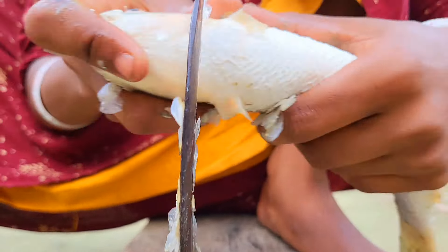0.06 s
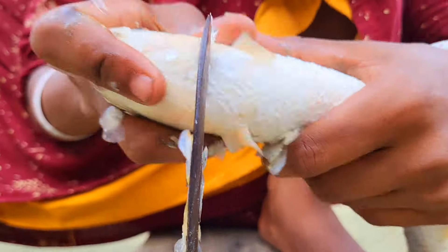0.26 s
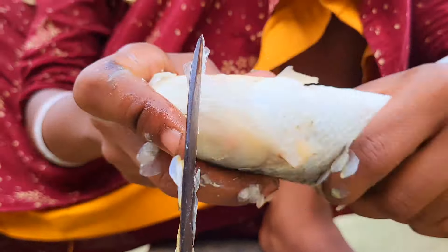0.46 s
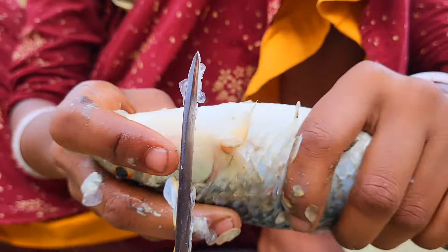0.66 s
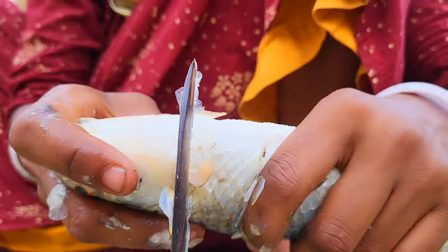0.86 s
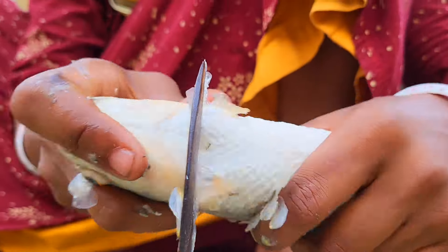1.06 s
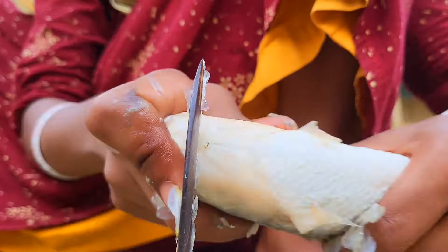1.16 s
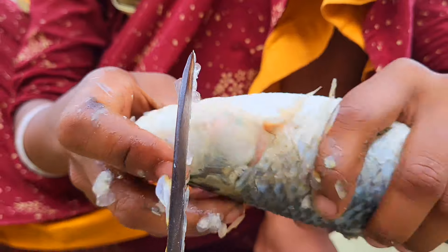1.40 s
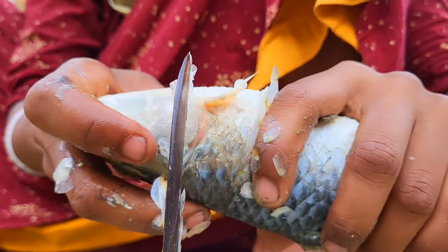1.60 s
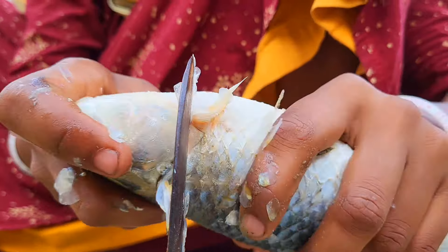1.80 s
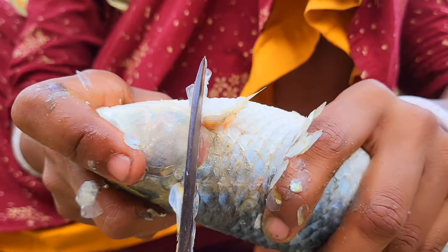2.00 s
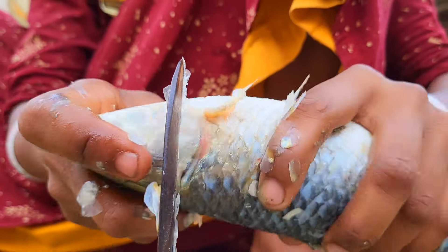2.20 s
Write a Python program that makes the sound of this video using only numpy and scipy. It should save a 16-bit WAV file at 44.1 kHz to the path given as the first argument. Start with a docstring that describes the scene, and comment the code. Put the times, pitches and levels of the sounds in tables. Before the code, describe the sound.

Two quick crackling scrapes of a wet fish on a blade edge, faint engine thudding far off

```python
"""Outdoors, microphones close to an upright steel blade: a fish is pushed against its edge.
Two hard strokes break scales in dense random clicks that ring the blade's modes; the first ends in a squeal,
a wavering sine. Around them wet fingers crackle softly, scales and slime tick as short noise bursts,
and the fish bumps the steel dully. Far off an engine thuds in coloured pulses and a bird chirps in
falling tones, over low rumble and thin hiss made of coloured noise."""
import sys
import numpy as np
from scipy import signal
from scipy.fft import rfft, irfft
from scipy.io import wavfile
from scipy.ndimage import uniform_filter1d

SR = 44100
rng = np.random.default_rng(int(sys.argv[2]) if len(sys.argv) > 2 else 0)


def inscribe(sig):
    """Save sig as 16-bit PCM at rate SR to the path in sys.argv[1].

    A 1-D sig is mono; a 2-D sig holds one channel per row.
    Samples are clipped to [-1, 1] before scaling.
    """
    pcm = np.round(np.clip(np.atleast_2d(sig).T, -1, 1) * 32767)
    wavfile.write(sys.argv[1], SR, pcm.astype(np.int16))


N = 99225


def amp(db):
    """Decibels to gain."""
    return 10 ** (np.asarray(db) / 20)


def unit(x):
    """Scale to an rms of 1."""
    return x / np.sqrt(np.mean(x ** 2))


def unit_energy(x):
    """Scale to an energy of 1."""
    return x / np.sqrt(np.sum(x ** 2))


def times():
    """The time of every sample in seconds."""
    return np.arange(N) / SR


def curve(rows):
    """Gain along (time_s, level_db) points, silent outside them."""
    s, db = np.array(rows).T
    return amp(np.interp(times(), s, db, left=-np.inf, right=-np.inf))


def through(x, response):
    """Pass a sound through an impulse response."""
    return signal.fftconvolve(x, response)[:N]


def edge(x, hz, kind, order=2):
    """Low-pass or high-pass."""
    return signal.sosfilt(signal.butter(order, hz, kind, fs=SR, output="sos"), x)


def wander(hold_s):
    """Smooth random drift with an rms of 1, slower for a longer hold."""
    return unit(edge(rng.standard_normal(N), .5 / hold_s, "low", order=4))


def colour(points, size=8192):
    """Causal, minimum-phase response of unit energy shaped by (freq_hz, level_db) points."""
    hz, db = np.array(points).T
    f = np.maximum(np.arange(size // 2 + 1) * SR / size, 1)
    level_db = np.interp(np.log(f), np.log(hz), db)
    # folding the cepstrum forward puts the energy at the start
    cepstrum = irfft(np.log(amp(level_db)))
    cepstrum[1:size // 2] *= 2
    cepstrum[size // 2 + 1:] = 0
    return unit_energy(irfft(np.exp(rfft(cepstrum))))


def noise(points):
    """Steady noise of the given colour."""
    return unit(through(rng.standard_normal(N), colour(points)))


def crackle(per_s, spread_db, size=1024):
    """Dense clicks of uneven size and random sign, evened to a steady mean level."""
    sizes = amp(spread_db * np.minimum(rng.exponential(size=N), 4))
    hits = rng.random(N) < per_s / SR
    clicks = hits * sizes * np.sign(rng.standard_normal(N))
    local_power = np.abs(uniform_filter1d(clicks ** 2, size))
    return clicks / np.sqrt(local_power + 1e-9)


def bursts(rows, tail_db, size=8192):
    """A click with a decaying noise tail for each (start_s, level_db, decay_s) row."""
    out, t = np.zeros(N + size), np.arange(size) / SR
    # the level is the rms of the burst's energy spread over 1.5 ms
    span = np.sqrt(.0015 * SR)
    grits = rng.standard_normal((len(rows), size))
    for (s, db, decay_s), grit in zip(rows, grits):
        burst = amp(tail_db) * grit * np.exp(-t / decay_s)
        burst[0] = 4  # the click itself
        i = int(np.clip(s * SR, 0, N - 1))
        out[i:i + size] += amp(db) * span * unit_energy(burst)
    return out[:N]


def scraping():
    """Scales crackle and snap, heard directly and through the blade."""
    # force of the two strokes: time_s, level_db
    first_force = [(.186, -44.5), (.204, -41), (.211, -32.5), (.244, -25.5), (.268, -22.5), (.281, -20.5),
                   (.298, -27), (.322, -46), (.37, -59.5)]
    second_force = [(.995, -49), (1.012, -35.5), (1.026, -32.5), (1.04, -19), (1.058, -25), (1.083, -21),
                    (1.094, -34), (1.114, -38), (1.128, -52)]
    # colour of a breaking scale at each microphone: freq_hz, level_db
    left_colour = [(100, -14.5), (300, -19.5), (1000, -39.5), (1700, -0.5), (2300, 11.5), (5000, 6.5),
                   (8000, 7), (12000, 5), (16000, -3.5)]
    right_colour = [(100, -37.5), (450, -43), (680, -52), (1500, -21), (2020, -21), (2450, -16), (3050, -6),
                    (4800, -4), (5900, 2.5), (7100, -1.5), (7700, -7.5), (8600, -18.5), (10800, -26),
                    (12800, -12), (16000, -16)]

    first, second, bump = stroke(first_force), stroke(second_force), bumps()
    single = snaps()
    grip = edge(rubs(), 2500, "high", order=5)
    slime = ticks()
    scales = first + second + single + grip + slime

    # how strongly each contact drives the steel
    push = amp(-2) * first + amp(-14.5) * second + amp(-25) * single
    push = push + amp(-31.5) * grip + amp(10.5) * bump
    body = squeal() + blade(push) + amp(-28) * bump  # last, the direct thud

    # the first stroke faces left; every grain flies its own way
    grain_scatter = unit(1 + wander(0.00039))
    leftward = (amp(6.5) * first + second + single + grip + slime) * grain_scatter
    left = amp(-17.5) * through(leftward, colour(left_colour)) + body[0]
    right = amp(0.5) * through(scales, colour(right_colour)) + body[1]
    right_lag_s = .00014
    right = np.pad(right, (int(right_lag_s * SR), 0))[:N]
    return np.array([nearby(left, 2), nearby(right, -10.5)])


def stroke(force):
    """Scales break in uneven clusters as the edge catches and slips over their rows."""
    catch_s, catch_db = 0.003, 3
    catching = amp(catch_db * np.clip(wander(catch_s), -2, 2))
    grains = crackle(per_s=3000, spread_db=3)
    return curve(force) * unit(grains * catching)


def snaps():
    """Single scales snap free, each a click with a tearing noise tail."""
    # snaps, levels before the gain below: start_s, level_db, tearing_decay_s
    snap_rows = [(.189, -34, 0.0042), (.207, -12, 0.0061), (.2487, -11, 0.0015), (.2517, -14, 0.0006),
                 (.265, -11.5, 0.005), (.271, -8.5, 0.00043), (.287, -13.5, 0.0013), (.311, -22.5, 0.0015),
                 (.509, -39, 0.00011), (.5135, -51, 0.0002), (.925, -45.5, .0003), (.9585, -39, 0.00017),
                 (1.005, -25, 0.00068), (1.0124, -14.5, 0.00012), (1.0167, -9, 0.00023),
                 (1.0296, -11, 0.0016), (1.0365, -23, 0.00042), (1.0533, -12, 0.00044),
                 (1.0586, -6.5, 0.00089), (1.0647, -15, 0.00029), (1.0743, -20, 0.00038),
                 (1.0767, -13.5, 0.00076), (1.0817, -20.5, 0.00087), (1.0903, -23, 0.0011),
                 (1.084, -14, 0.00092), (1.139, -30, 0.0013), (1.230, -43, 0.00019),
                 (1.246, -39.5, 0.00034), (1.288, -41, 0.00077), (1.3595, -40.5, 0.0004),
                 (1.688, -41.5, .0003), (1.695, -42.5, 0.00037), (1.743, -34.5, 0.0018),
                 (1.7895, -30.5, 0.00085), (1.8115, -22.5, 0.0018), (1.816, -25.5, 0.00033),
                 (1.849, -32, 0.00041), (1.903, -42.5, 0.0009), (1.975, -29.5, 0.00067),
                 (2.052, -26.5, 0.0011), (2.141, -37, 0.00035), (2.1625, -41, .0003),
                 (2.222, -36.5, 0.00071)]
    return amp(1) * bursts(snap_rows, tail_db=5)


def blade(push):
    """The steel's modes ring briefly, damped and detuned by the sliding fish."""
    # modes, frequency before detuning: freq_hz, t60_s, left_db, right_db
    modes = [(487.4, 0.15, -26, -15.5), (976, 0.021, -30, -46), (1078, 0.074, -29, -16.5),
             (1215, 0.017, -15.5, -11), (1502, 0.014, -24, -17.5), (2040, 0.015, -13.5, -6.5),
             (2740, 0.024, -24, -8.5), (3940, 0.0075, -31, -2.5), (5040, 0.016, -28, -4.5),
             (6690, 0.04, -26, 1), (14200, .015, -25.5, -12)]
    detune_share, detune_hold_s = .015, 0.012
    out = 0
    for hz, t60, left_db, right_db in modes:
        mode_hz = hz * (1 + detune_share * wander(detune_hold_s))
        turn = np.exp(2j * np.pi * np.cumsum(mode_hz) / SR)
        keep = np.exp(-np.log(1000) / (t60 * SR))  # decay per sample
        # shift the mode to 0 Hz, let it decay there, and shift it back
        swing = signal.lfilter([np.sqrt(2 * (1 - keep ** 2))], [1, -keep], push / turn)
        ring = np.real(turn * swing)
        out = out + amp([[left_db], [right_db]]) * ring
    return out


def squeal():
    """The edge sticks and slips for a moment: clean squeals up high, rough groans lower down."""
    # squeals and groans, left_db relative to the right:
    # middle_s, half_length_s, mean_pitch_hz, level_db, left_db, pitch_waver_share
    squeal_rows = [(0.135, 0.0073, 602, -44, -2.5, 0.42), (.139, 0.0057, 6070, -29, -14.5, 0.044),
                   (0.2108, 0.0035, 1057, -22, -10.5, .06), (0.2797, .0051, 6573, -6.5, -24.5, 0.011),
                   (0.292, .008, 6670, -17, -25, .01), (2.052, 0.0023, 5130, -27.5, -9, .02),
                   (2.056, 0.0094, 6592, -35.5, -9, 0.0095)]
    waver, out = wander(0.00054), 0
    for s, half_s, hz, db, left_db, share in squeal_rows:
        swell = np.exp(-((times() - s) / half_s) ** 4)
        pitch_hz = hz * (1 + share * waver)
        tone = unit(np.sin(2 * np.pi * np.cumsum(pitch_hz) / SR))
        out = out + amp([[left_db], [0]]) * amp(db) * swell * tone
    return out


def bumps():
    """Soft flesh pushes the blade: noise blows without treble."""
    # bumps, level before the low-pass: start_s, level_db, contact_decay_s, upper_edge_hz
    bump_rows = [(.005, -34, 0.083, 604), (.138, -36, 0.016, 1290), (.208, -26.5, 0.0029, 1550),
                 (.249, -26, 0.0018, 1390), (0.336, -48.5, 0.035, 1360), (1.142, -44.5, 0.024, 1740),
                 (2.118, -40.5, 0.0018, 2200), (2.123, -25, 0.027, 427)]
    out = 0
    for s, db, contact_s, hz in bump_rows:
        blow = bursts([(s, db, contact_s)], tail_db=-6.5)
        out = out + edge(blow, hz, "low", order=3)
    return out


def rubs():
    """Soft crackle of the wet grip, swelling quickly and fading with each rub."""
    # steady wet handling: time_s, level_db
    handling = [(0, -48.5), (.17, -46), (.4, -53.5), (.6, -63.5), (.88, -58.5), (1.0, -50), (1.22, -60),
                (1.39, -54.5), (1.5, -61), (1.68, -53), (1.9, -51.5), (2.15, -51), (2.25, -46)]
    # light rubs of fish and fingers: peak_s, fade_s, level_db
    rub_rows = [(.002, 0.031, -39), (0.137, 0.0099, -32), (0.354, 0.0026, -40), (0.431, 0.027, -44.5),
                (0.969, 0.032, -43), (1.155, 0.019, -37), (1.291, 0.0055, -40.5), (1.747, 0.0052, -39),
                (1.794, 0.0058, -36.5), (1.813, 0.0038, -34.5), (1.835, 0.006, -37), (1.998, 0.022, -44.5),
                (2.049, 0.002, -25.5), (2.065, 0.0078, -30), (2.119, 0.0016, -30.5), (2.18, 0.044, -53)]
    rise_s = 0.0045
    t, power = times(), curve(handling) ** 2
    for s, fade_s, db in rub_rows:
        swell = np.exp(-np.maximum((s - t) / rise_s, (t - s) / fade_s))
        power = power + (amp(db) * swell) ** 2
    return np.sqrt(power) * crackle(per_s=1100, spread_db=2)


def ticks():
    """Films of slime part with tiny bright clicks, high-passed noise bursts."""
    # ticks, level before the high-pass and gain: start_s, level_db
    tick_rows = [(.372, -40.5), (.540, -42.5), (0.712, -46), (1.362, -42.5), (1.417, -55), (1.7816, -27)]
    decay_s = .0002
    clicks = bursts([(s, db, decay_s) for s, db in tick_rows], tail_db=6)
    return amp(11) * edge(clicks, 8100, "high")


def nearby(x, db):
    """Quick scattered reflections from hands, body and ground: a short noise tail."""
    t60_s, rise_s = 0.045, 0.0012
    t = times()[:N // 8]
    fade = np.exp(-np.log(1000) * t / t60_s)
    tail = rng.standard_normal(len(t)) * fade * (1 - np.exp(-t / rise_s))
    return x + amp(db) * through(x, unit_energy(tail))


def engine():
    """A far single-cylinder engine: one thud a firing, with scattered echoes."""
    # running of the engine: time_s, firings_per_s, level_db
    running = [(0, 15.3, -42), (0.221, 15.54, -38), (.28, 13.85, -44.5), (1.199, 14.2, -47),
               (1.452, 14.2, -47), (1.6, 13.3, -42.5), (2.25, 12.6, -44)]
    # exhaust colour: freq_hz, level_db
    exhaust = [(30, -28), (56, -4.5), (75, -7), (98, -2.5), (122, -6.5), (141, 7.5), (157, 1.5),
               (180, -24.5), (260, -25), (450, -45), (1500, -95)]
    first_firing_s, jitter_s, scatter_db = 0.0198, 0.0006, 0.27
    echo_decay_s, echo_db = 0.05, -4

    s, rate, db = np.array(running).T
    turns = np.cumsum(np.interp(times(), s, rate)) / SR - first_firing_s * rate[0]
    firings = np.flatnonzero(np.diff(np.floor(turns)))
    pulses = np.zeros(N)
    for i, (late, loud) in zip(firings, rng.standard_normal((N // 1000, 2))):
        at = int(np.clip(i + jitter_s * late * SR, 0, N - 1))
        pulses[at] = amp(scatter_db * loud)

    t = times()[:N // 12]
    echo_tail = unit_energy(rng.standard_normal(len(t)) * np.exp(-t / echo_decay_s))
    echoes = through(pulses, echo_tail)
    thuds = through(pulses + amp(echo_db) * echoes, colour(exhaust))
    return amp(np.interp(times(), s, db)) * unit(thuds)


def bird():
    """Short falling chirps of a far bird, blurred by the distance, weaker on the left."""
    # chirps: middle_s, level_db
    chirp_rows = [(1.425, -56.5), (1.643, -53.5)]
    middle_hz, fall_hz_per_s, half_s, blur_hz = 3400, 10100, 0.029, 500
    out = 0
    for s, db in chirp_rows:
        t = times() - s
        phase = 2 * np.pi * (middle_hz - fall_hz_per_s * t / 2) * t
        swell = np.exp(-(t / half_s) ** 2)
        tone = unit(wander(1 / blur_hz) * np.sin(phase))
        out = out + amp(db) * swell * tone
    return amp([[-19], [0]]) * out


def outdoors():
    """Low rumble, nearly the same on both sides, under a thin drifting hiss."""
    # spectra of the open air: freq_hz, level_db
    rumble_colour = [(20, -23), (40, -12.5), (60, 4), (120, 0.5), (155, 3.5), (185, -5.5), (270, -13.5),
                     (400, -20), (600, -26.5), (850, -39), (2000, -50), (4000, -45.5)]
    hiss_left = [(200, -6), (1200, 6.5), (1700, 9), (2600, -3.5), (3800, 10.5), (6500, -15), (8100, 16.5),
                 (9200, -7.5), (10500, 17.5), (13000, -6), (16000, 15.5)]
    hiss_right = [(200, -12), (1000, -16.5), (2500, -16.5), (3200, 1), (4400, -4.5), (5900, -2.5),
                  (7400, -2), (8700, -25.5), (11500, -17), (15500, -12.5)]
    # level of the rumble common to both sides: time_s, level_db
    rumble_level = [(0, -43.5), (.28, -43.5), (.45, -48.5), (1.2, -48.5), (1.9, -48.5), (2.25, -44)]
    side = amp(-9) * noise(rumble_colour) * np.array([[1], [-1]])
    rumble = noise(rumble_colour) + side
    drift = amp(2 * wander(0.11))  # 2 dB rms
    hiss = np.array([amp(-60.5) * noise(hiss_left), amp(-57) * noise(hiss_right)])
    return curve(rumble_level) * rumble + drift * hiss


def scene():
    """The scraping in front of the engine, a bird and the open air."""
    return scraping() + engine() + bird() + outdoors()


def record(dry):
    """The recorder clips the loudest peaks and cuts the top."""
    top_hz = 15700
    low_pass = signal.ellip(12, .1, 80, top_hz, fs=SR, output="sos")
    return signal.sosfilt(low_pass, np.clip(dry, -.9, .9))


dry = scene()
out = record(dry)
inscribe(out)
```